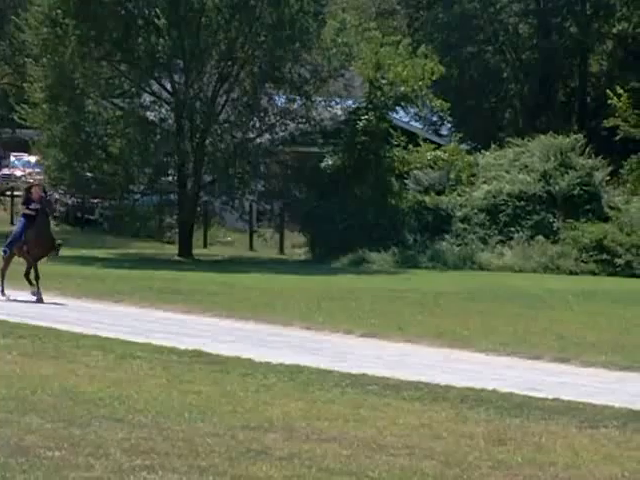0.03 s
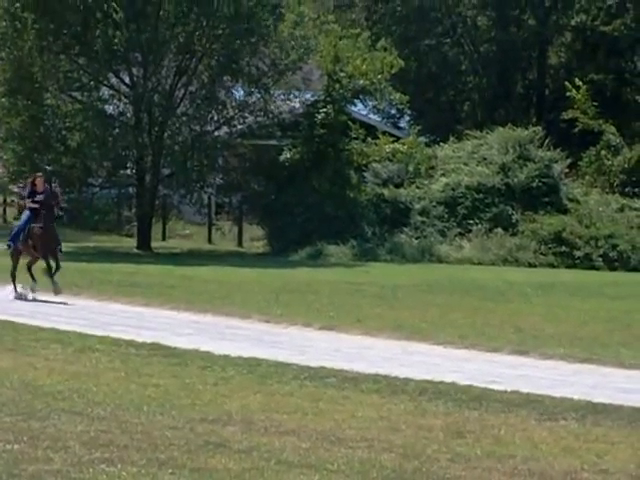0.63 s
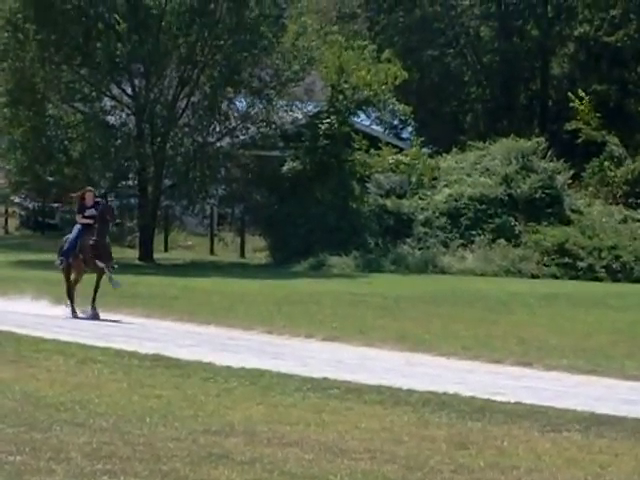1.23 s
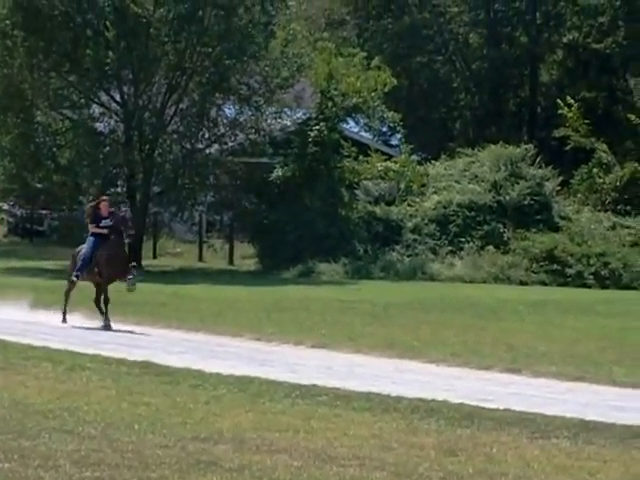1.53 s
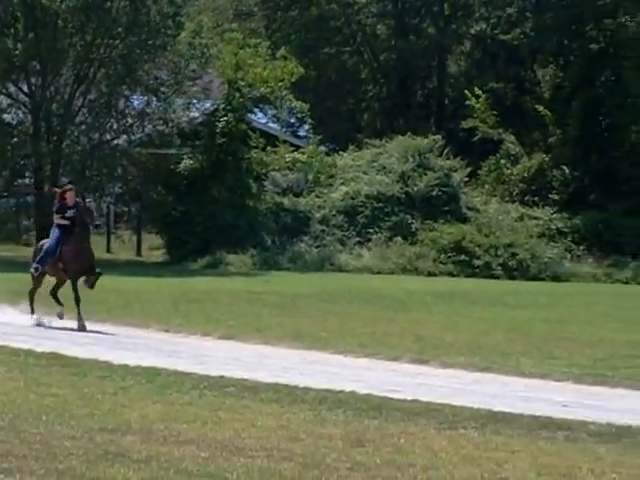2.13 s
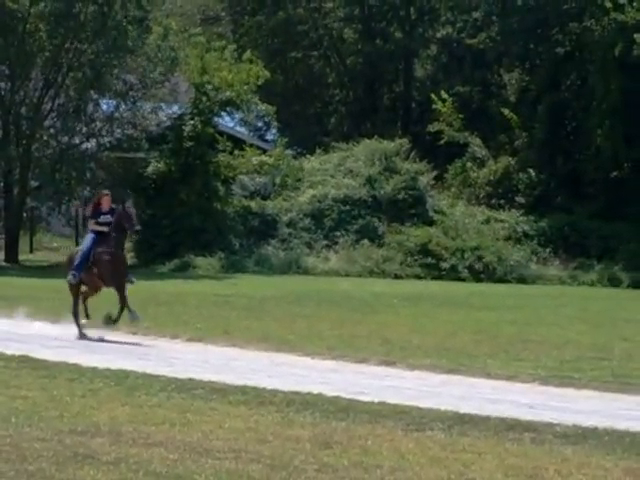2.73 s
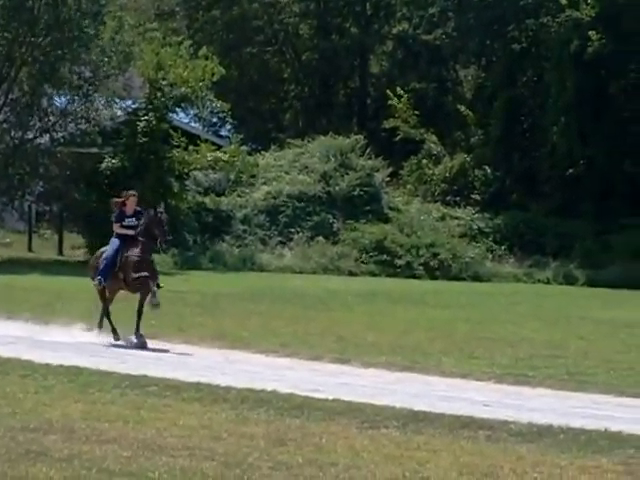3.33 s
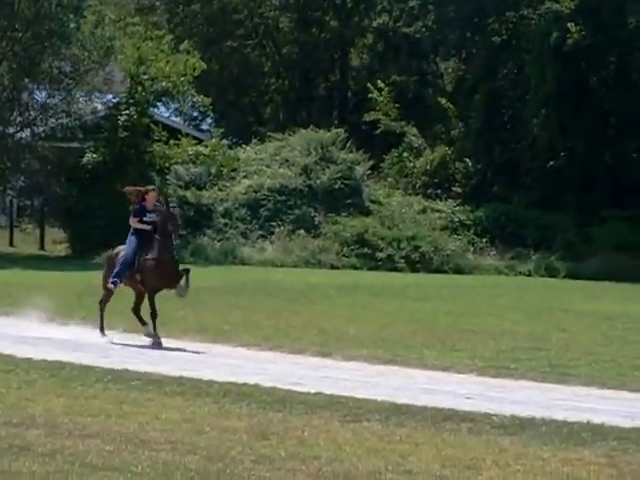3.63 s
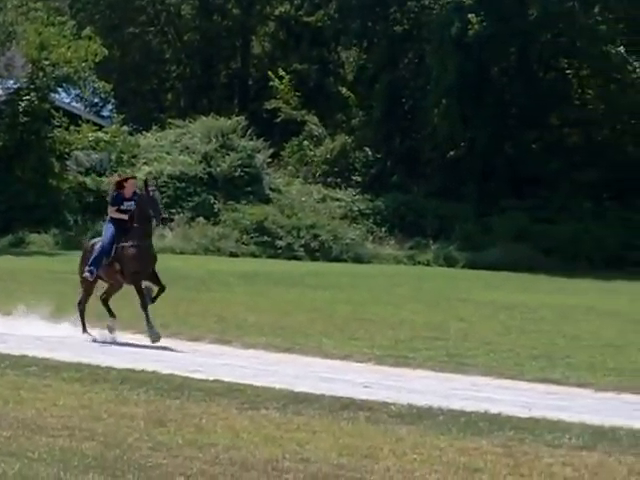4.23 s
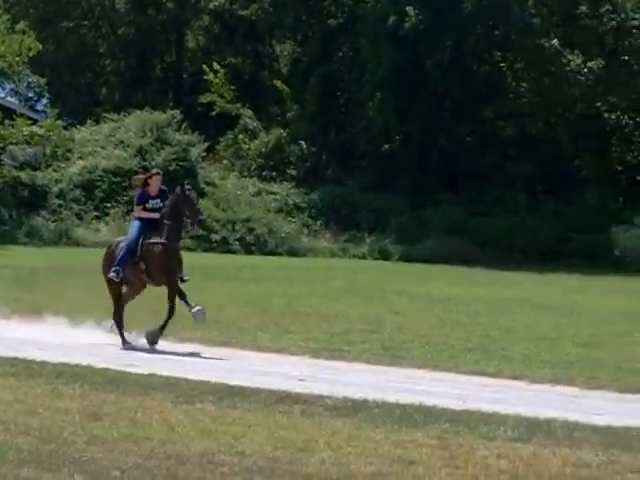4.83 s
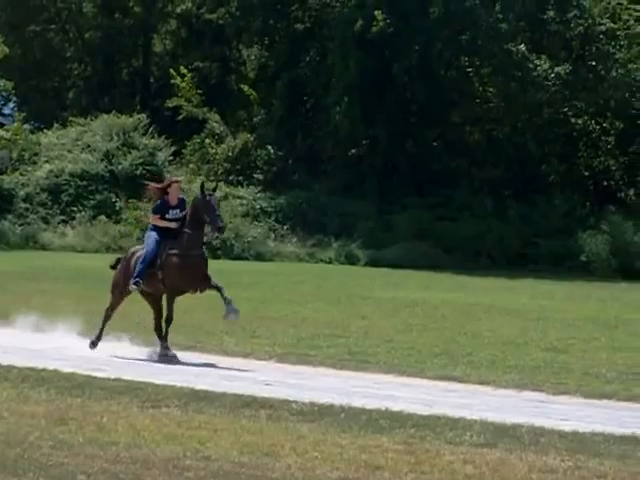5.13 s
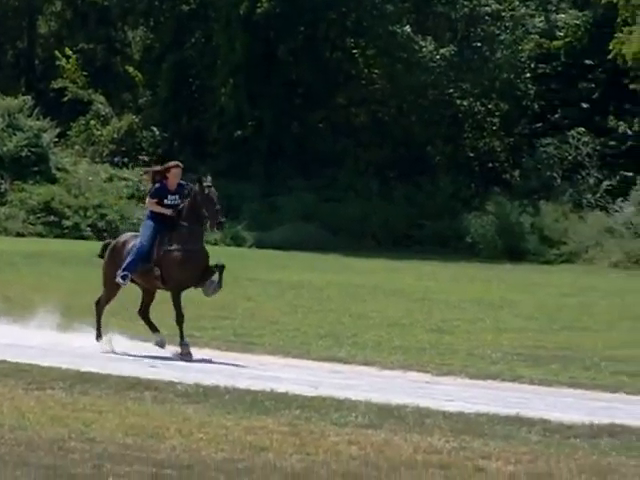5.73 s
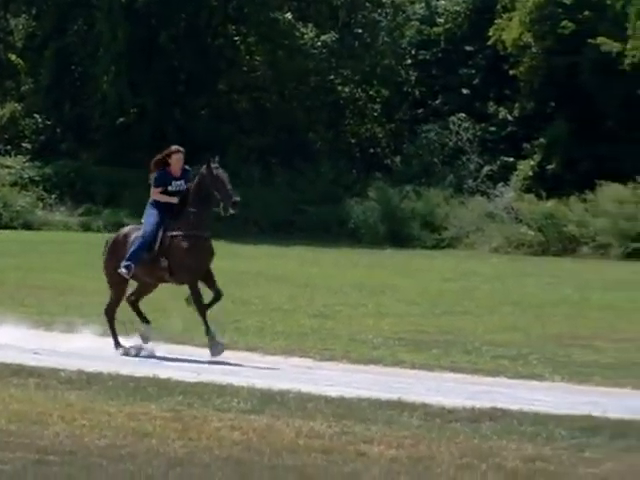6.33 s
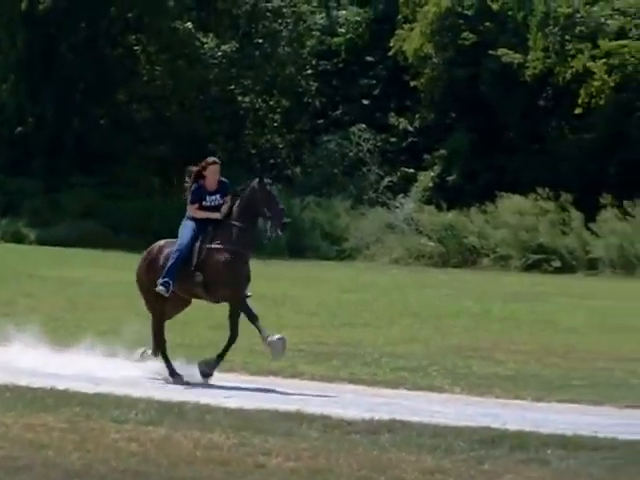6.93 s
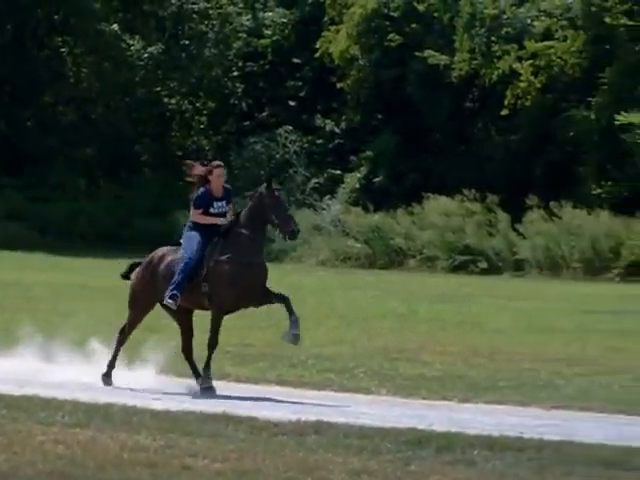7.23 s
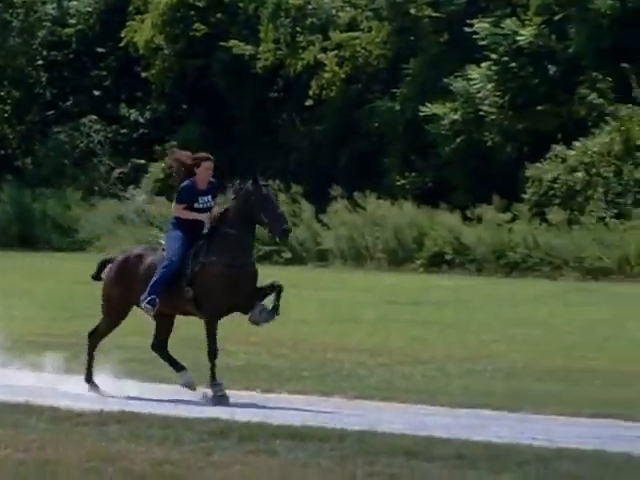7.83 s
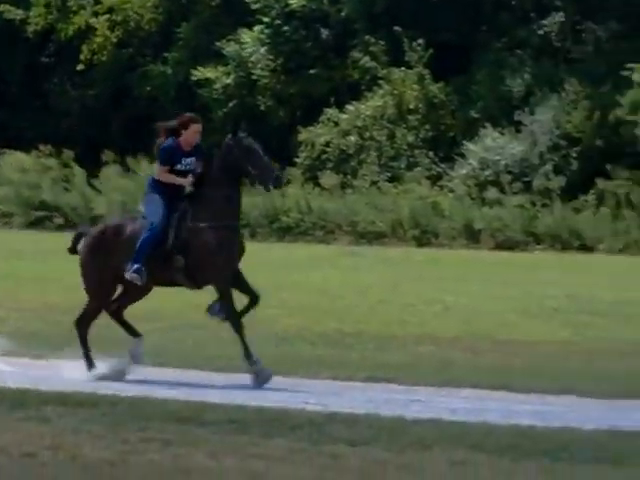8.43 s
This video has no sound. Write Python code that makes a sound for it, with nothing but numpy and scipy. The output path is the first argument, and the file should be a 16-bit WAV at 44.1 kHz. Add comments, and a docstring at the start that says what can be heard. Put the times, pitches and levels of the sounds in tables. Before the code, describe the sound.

A horse trots closer on gravel, its light hoofbeats under gusty wind on the microphone, hiss and a thin whine.

```python
"""Wind buffets the microphone over an outdoor hiss and a thin electronic whine. A horse trots up a
gravel track, far off at first: hooves knock on the packed bed, crunch the gravel and kick up stones;
grit patters back and the trees return dull echoes. The wind's eddies rumble, flutter and thump,
harder towards the end. Hiss and whine both sink in the last two seconds."""
import sys
import numpy as np
from scipy import signal
from scipy.fft import rfft, irfft, next_fast_len
from scipy.io import wavfile
from scipy.ndimage import uniform_filter1d

SR = 44100
rng = np.random.default_rng(int(sys.argv[2]) if len(sys.argv) > 2 else 0)


def store_wav(level_fs):
    """Save 16-bit WAV to argv[1]."""
    pcm = np.round(np.clip(np.atleast_2d(level_fs), -1, 1) * 32767)
    wavfile.write(sys.argv[1], SR, pcm.T.astype(np.int16))


N = 383669
TIME_S = np.arange(N) / SR

# Table levels are relative.
# gusts on the microphone: (start [s], length [s], rumble [dB], flutter [dB])
WIND_GUSTS = [(0.119, 0.41, -28.5, -42.5), (0.82, 0.46, -35, -49.5), (1.528, .17, -41, -50),
              (2.05, 0.56, -33, -45.5), (2.78, 0.46, -36, -45), (3.526, 0.062, -38, -46),
              (3.71, 0.31, -31.5, -44.5), (4.113, 0.35, -31, -41.5), (4.624, 0.021, -30.5, -36),
              (4.93, 0.078, -29.5, -37.5), (5.122, 0.52, -28.5, -39.5), (5.512, 0.071, -28.5, -39),
              (6.017, 0.2, -25.5, -39), (6.278, 0.18, -26.5, -38), (6.466, 0.079, -25, -34),
              (6.583, 0.25, -24, -38), (6.8, 0.43, -19.5, -37), (6.905, 0.033, -19, -25.5),
              (7.242, .18, -23, -43.5), (7.499, 0.19, -29, -47.5), (7.754, 0.41, -28.5, -51),
              (8.236, 0.32, -23.5, -39)]
# single eddies hitting the microphone: (time [s], level [dB], pitch [Hz])
EDDY_THUMPS = [(0.177, -21, 59.6), (4.653, -26.5, 228), (4.877, -30, 276), (5.566, -18.5, 60),
               (6.9268, -13.5, 154), (6.9377, -2.5, 143), (7.152, -8.5, 86), (7.1646, -10, 200),
               (7.436, -25.5, 260), (8.266, -24.5, 200), (8.311, -32, 370), (8.337, -22, 200),
               (8.359, -21.5, 190), (8.371, -19.5, 330), (8.395, -23.5, 330), (8.449, -24.5, 347),
               (8.498, -20, 190), (8.554, -25.5, 325), (8.591, -26, 340)]
# large eddies: (frequency [Hz], density [dB])
RUMBLE_SPECTRUM = [(15, -3.5), (30, 2), (60, -2), (100, -5.5), (150, -10), (220, -20.5), (350, -41)]
# small eddies: (frequency [Hz], density [dB])
FLUTTER_SPECTRUM = [(100, -20.5), (180, -1), (260, -4), (380, -9), (520, -16), (700, -25.5), (950, -44.5)]
# distant trees and air: (frequency [Hz], density [dB])
HISS_SPECTRUM = [(100, -9), (300, -0.5), (480, -1.5), (700, 2.5), (900, 3), (1120, 0), (1600, 0),
                 (2200, -5), (3500, -7), (5000, -9.5), (7500, -12), (8500, -19)]
# envelope of hiss and whine: (time [s], level [dB])
BACKGROUND_LEVEL = [(0.32, -49.5), (0.53, -49), (4.85, -47.5), (5.2, -49), (5.52, -48.5), (6.78, -52),
                    (7.32, -62.5), (8.39, -63.5), (8.54, -64), (8.7, -70.5)]
# electronic whine: (harmonic [n], level [dB])
WHINE_HARMONICS = [(1, -10.5), (2, -13.5), (4, -23.5), (5, -15), (6, -20), (7, -16.5), (8, -36.5)]
# envelope of falling grit: (time [s], level [dB])
PATTER_LEVEL = [(0, -60), (5, -57), (6.7, -62.5), (8.7, -67)]
# stamps and scuffs: (time [s], knock [dB], crunch [dB], crunch pitch [Hz], crunch swell [s])
FOOTFALLS = [(0.546, -56, -46.5, 2800, 0.0017), (0.886, -40, -48, 2200, .003),
             (1.075, -45, -47, 3000, 0.0056), (1.264, -58, -40.5, 4000, 0.0032),
             (1.444, -29.5, -45, 3500, .012), (1.968, -60, -43.5, 2400, .0025),
             (2.159, -27, -48, 2000, 0.0017), (2.676, -47, -44, 2200, 0.0027),
             (3.568, -32, -42, 3500, 0.0071), (3.763, -56, -43, 2600, 0.004),
             (3.893, -34.5, -42.5, 3900, .005), (4.082, -37, -39.5, 2500, 0.0043),
             (4.263, -27.5, -40.5, 2000, 0.0059), (4.434, -41, -45.5, 4000, 0.0028),
             (4.6, -36, -44.5, 3900, .003), (4.78, -39, -39, 2300, 0.0028), (4.974, -23, -46.5, 1950, .002),
             (5.111, -52, -41.5, 2800, 0.0036), (5.294, -28.5, -39.5, 3000, .003),
             (5.472, -33.5, -40.5, 2100, 0.003), (5.664, -30, -50.5, 2300, 0.014),
             (5.814, -51, -40, 2600, .002), (5.983, -36.5, -50, 2600, .01),
             (6.175, -55, -40.5, 2950, 0.0041), (6.362, -34, -50.5, 4100, .011),
             (6.508, -39, -46.5, 2300, 0.0074), (6.686, -36.5, -50.5, 2400, .01),
             (6.86, -50, -43.5, 2000, 0.0039), (7.071, -43, -50, 3500, 0.019),
             (7.19, -59, -50, 3400, 0.0018), (7.385, -48, -54, 2800, 0.0045),
             (7.536, -55, -50.5, 3000, .0025), (7.752, -55, -59, 2800, .011),
             (7.866, -60, -58.5, 3600, .009), (8.063, -57, -59, 2200, 0.0053),
             (8.244, -54, -43.5, 3300, 0.0042), (8.425, -47, -56.5, 2900, 0.012),
             (8.578, -60, -49.5, 2900, 0.0049)]
# hoof on the packed bed: (frequency [Hz], level [dB], t60 [s])
KNOCK_MODES = [(675, -2, 0.035), (800, -1.5, 0.023), (1490, -11, 0.036), (1680, -15.5, 0.064)]
# kicked stones colliding: (time [s], level [dB], pitch [Hz])
STONE_CLACKS = [(1.144, -40.5, 6000), (1.186, -51, 3700), (3.304, -42, 3400), (3.375, -28.5, 3650),
                (3.593, -41.5, 3000), (3.62, -43, 5200), (3.723, -41, 3800), (3.918, -39, 2200),
                (4.005, -42, 2900), (4.338, -44, 5500), (4.468, -43.5, 3800), (4.673, -36, 6300),
                (5.217, -39.5, 5700), (5.23, -41, 5700), (5.284, -43, 3500), (5.314, -39, 2820),
                (6.076, -39.5, 5650), (6.416, -43.5, 5730), (6.717, -42.5, 4400), (6.759, -38, 6000),
                (7.446, -44, 6360), (7.476, -53, 5700), (8.145, -46, 4600), (8.227, -50, 6300),
                (8.283, -53, 3300)]
# reflections from the trees: (delay [s], level [dB])
TREE_ECHOES = [(.055, -25), (.13, -25.5)]

GUST_ATTACK_S, GUST_SAG_DB_PER_S, GUST_RELEASE_S = 0.022, 4.5, 0.072
BREEZE_RUMBLE_DB, BREEZE_FLUTTER_DB = -39, -50.5
PULSE_DB, PULSES_PER_S = 1.07, 28
SMALL_EDDY_HZ, BRIGHTENING_EXPONENT, BRISK_FLUTTER_DB = 302, 0.2, -34
WHINE_HZ = 961.95
PATTER_PER_S, CONTACTS_PER_S, CLACK_SWELL_CYCLES = 260, 5000, 12.8
MIC_OPEN_S, MIC_CLIP, CUTOFF_HZ = 0.135, 0.29, 7850


def from_db(db):
    """Decibels to gain."""
    return 10 ** (np.asarray(db) / 20)


def unit_rms(x):
    """Scale to unit rms."""
    return x / np.sqrt(np.mean(x ** 2) + 1e-20)


def curve(rows):
    """(time, value) rows interpolated to every sample."""
    return np.interp(TIME_S, *np.transpose(rows))


def add(out, time_s, sound):
    """Mix a sound in at time_s."""
    i = int(time_s * SR)
    out[i:i + len(sound)] += sound[:N - i]


def butter(order, hz, kind="low"):
    """Butterworth filter sections."""
    return signal.butter(order, hz, kind, fs=SR, output="sos")


def coloured_noise(spectrum):
    """Unit-rms noise of a given spectrum, rolled off beyond both ends."""
    hz, db = np.transpose(spectrum)
    size = next_fast_len(N)
    bins_hz = np.maximum(np.arange(size // 2 + 1) * SR / size, 1)
    gain = from_db(np.interp(np.log(bins_hz), np.log(hz), db))
    gain *= np.minimum(bins_hz / hz[0], 1) * np.minimum(hz[-1] / bins_hz, 1) ** 2
    return unit_rms(irfft(rfft(rng.standard_normal(size)) * gain, size)[:N])


def steady(x, span_s):
    """Even out the slow swells of a noise."""
    return x / np.sqrt(uniform_filter1d(x * x, max(int(span_s * SR), 2)) + 1e-9)


def drift(knots_per_s):
    """Random wander, unit rms."""
    knots = rng.standard_normal(N // 50)
    return unit_rms(np.interp(TIME_S * knots_per_s, np.arange(len(knots)), knots))


def resonance(x, hz, width_hz):
    """Two-pole resonance, unit peak gain."""
    radius = np.exp(-np.pi * width_hz / SR)
    feedback = [1, -2 * radius * np.cos(2 * np.pi * hz / SR), radius ** 2]
    return signal.lfilter(np.array([1, 0, -1]) * (1 - radius ** 2) / 2, feedback, x)


def gust(start_s, length_s):
    """Gust envelope: arrives quickly, sags while blowing, dies away."""
    age_s = np.maximum(TIME_S - start_s, 0)
    attack = np.minimum(age_s / GUST_ATTACK_S, 1)
    release = np.exp(-np.clip((age_s - length_s) / GUST_RELEASE_S, 0, 20))
    return attack * from_db(-GUST_SAG_DB_PER_S * age_s) * release


def wind():
    """Gusts over a breeze: large eddies rumble, small ones flutter on them, the strongest thump."""
    rumble_gain, flutter_gain = from_db(BREEZE_RUMBLE_DB), from_db(BREEZE_FLUTTER_DB)
    for start_s, length_s, rumble_db, flutter_db in WIND_GUSTS:
        blow = gust(start_s, length_s)
        rumble_gain = np.hypot(rumble_gain, from_db(rumble_db) * blow)
        flutter_gain = np.hypot(flutter_gain, from_db(flutter_db) * blow)
    rumble = steady(coloured_noise(RUMBLE_SPECTRUM), span_s=0.15)
    flutter = steady(coloured_noise(FLUTTER_SPECTRUM) * from_db(2.6 * rumble), span_s=0.11)
    dull = signal.sosfiltfilt(butter(3, SMALL_EDDY_HZ), flutter)
    brightness = (flutter_gain / from_db(BRISK_FLUTTER_DB)) ** BRIGHTENING_EXPONENT
    flutter = dull + (flutter - dull) * brightness
    pulsing = from_db(-1.5 + PULSE_DB * drift(PULSES_PER_S))
    out = pulsing * (rumble_gain * rumble + flutter_gain * flutter)
    t = np.arange(-SR // 20, SR // 20) / SR
    for time_s, db, hz in EDDY_THUMPS:
        passing = (np.pi * hz * t) ** 2
        thump = (1 - 2 * passing) * np.exp(-passing)  # pressure peak, suction either side
        add(out, time_s + t[0], from_db(db) * thump)
    return out


def background():
    """Hiss of distant trees and air plus a wavering electronic whine, on one envelope."""
    hiss = coloured_noise(HISS_SPECTRUM) * from_db(1.0 + 1.03 * drift(30))
    phase = 2 * np.pi * np.cumsum(WHINE_HZ + 0.25 * drift(8)) / SR
    whine = sum(from_db(db + 1.3 * drift(10)) * np.sin(round(n) * phase) for n, db in WHINE_HARMONICS)
    return from_db(curve(BACKGROUND_LEVEL) + 3.5) * (hiss + whine)


def pebbles(impacts, pitches_hz, width_ratio):
    """Each impact rings one pebble, picked at random."""
    struck = rng.integers(0, len(pitches_hz), len(impacts))
    return sum(resonance(impacts * (struck == k) + 1e-18, hz, width_ratio * hz) / np.sqrt(hz)
               for k, hz in enumerate(pitches_hz))


def patter():
    """Thrown grit lands at random, one tick a grain."""
    rate_per_s = PATTER_PER_S * from_db(4 * drift(14))
    landings = rng.random(N) < rate_per_s / SR
    strength = from_db(5.0 * np.minimum(rng.exponential(1, N), 3))
    ticks = pebbles(landings * strength, np.geomspace(2600, 7200, num=6), width_ratio=0.28)
    return from_db(curve(PATTER_LEVEL)) * unit_rms(ticks)


def hooves():
    """Each footfall rings the hollow hoof a little differently and crushes the gravel."""
    out = np.zeros(N)
    t = np.arange(SR // 8) / SR
    for time_s, knock_db, crunch_db, crunch_hz, swell_s in FOOTFALLS:
        detune = 1 + 0.033 * rng.standard_normal()
        knock = np.zeros(len(t))
        for hz, db, t60_s in KNOCK_MODES:
            decay = from_db(db + 0.39 * rng.standard_normal() - 60 * t / t60_s)
            knock += decay * np.sin(2 * np.pi * hz * detune * t)
        knock = signal.sosfilt(butter(4, 520, "high"), knock)  # a small body radiates little bass
        crunch = gravel(crunch_hz, swell_s, width_ratio=1.35, low_cut_ratio=0.46,
                        settle_db=-8.0, settle_s=0.034, grain_db=2.5)
        add(out, time_s, from_db(knock_db + 1.5) * knock)
        add(out, time_s, from_db(crunch_db + 2.5) * crunch)
    return out


def gravel(hz, swell_s, width_ratio, low_cut_ratio, settle_db, settle_s, grain_db):
    """Stones grind in a burst of tiny contacts, then settle more quietly."""
    t = np.arange(SR // 5) / SR
    contacts = (rng.random(len(t)) < CONTACTS_PER_S / SR) * rng.choice([-1, 1], len(t))
    strength = from_db(grain_db * np.minimum(rng.exponential(1, len(t)), 3))
    pitches_hz = np.geomspace(1400, 7600, num=12) * (1 + 0.053 * rng.standard_normal(12))
    grains = pebbles(contacts * strength, pitches_hz, width_ratio=0.2)
    grains = resonance(grains, hz, width_ratio * hz)
    low_cut_hz = low_cut_ratio * min(hz, 6000)
    grains = signal.sosfilt(butter(2, [low_cut_hz, CUTOFF_HZ], "band"), grains)
    age = t / swell_s
    burst = age * np.exp(1 - age)
    settling = from_db(settle_db) * (1 - np.exp(-age)) * np.exp(-t / settle_s)
    return steady(unit_rms(grains), span_s=0.0094) * np.hypot(burst, settling)


def stones():
    """Flung stones clack, brighter and shorter than a footfall; smaller ones are briefer."""
    out = np.zeros(N)
    for time_s, db, hz in STONE_CLACKS:
        clack = gravel(hz, CLACK_SWELL_CYCLES / hz, width_ratio=0.64, low_cut_ratio=0.84,
                       settle_db=-13.5, settle_s=0.023, grain_db=-0.5)
        add(out, time_s, from_db(db) * clack)
    return out


def scene():
    """Wind, hiss and whine over the horse and its dull echoes."""
    horse = hooves() + stones() + patter()
    reflected = signal.sosfilt(butter(1, 2500), horse)
    out = horse + wind() + background()
    for delay_s, db in TREE_ECHOES:
        add(out, delay_s, from_db(db) * reflected)
    return out[None]


def record(dry):
    """The microphone opens after a moment, overloads on the hardest gusts and cuts the high treble."""
    clipped = np.clip(dry * (TIME_S > MIC_OPEN_S), -MIC_CLIP, MIC_CLIP)
    return signal.sosfilt(signal.cheby1(14, 0.1, CUTOFF_HZ, fs=SR, output="sos"), clipped)


dry = scene()
out = record(dry)
store_wav(out)
```